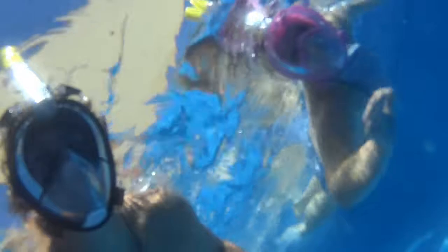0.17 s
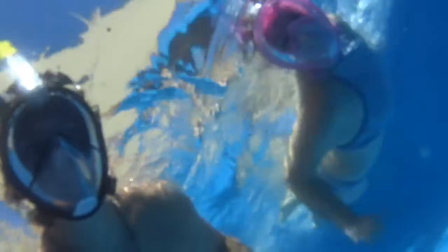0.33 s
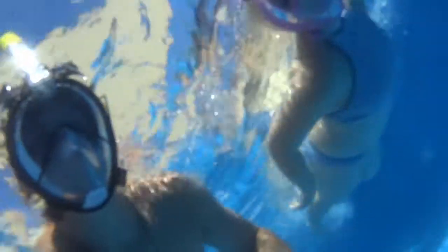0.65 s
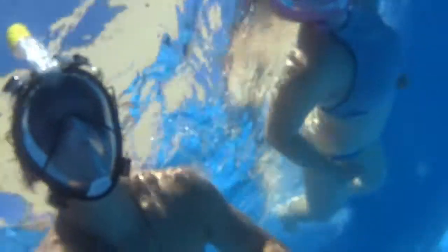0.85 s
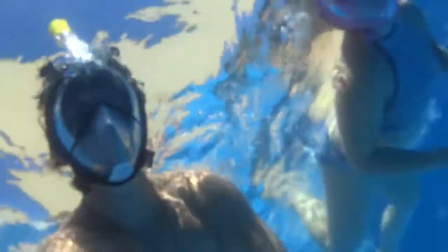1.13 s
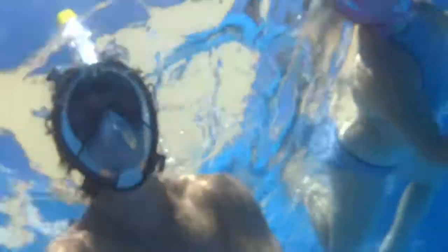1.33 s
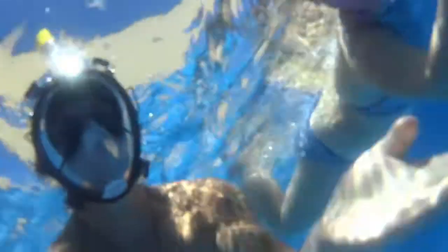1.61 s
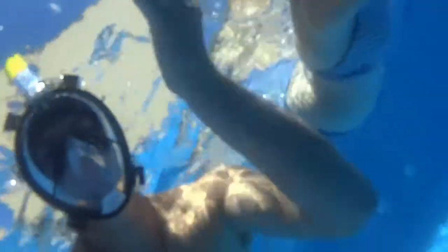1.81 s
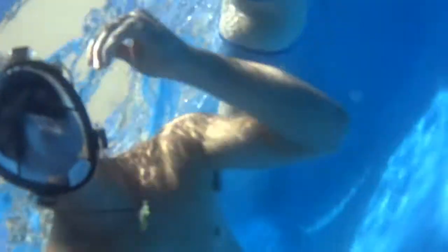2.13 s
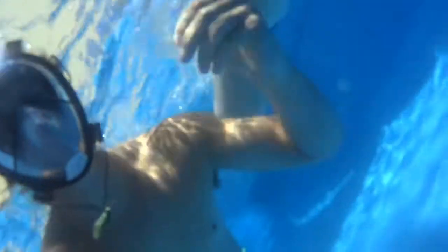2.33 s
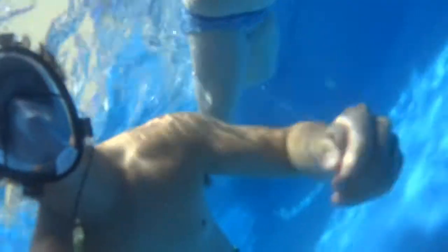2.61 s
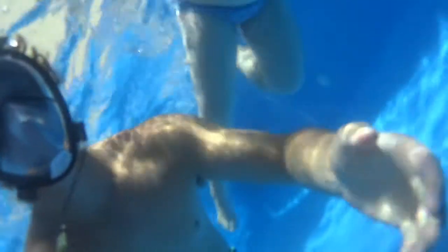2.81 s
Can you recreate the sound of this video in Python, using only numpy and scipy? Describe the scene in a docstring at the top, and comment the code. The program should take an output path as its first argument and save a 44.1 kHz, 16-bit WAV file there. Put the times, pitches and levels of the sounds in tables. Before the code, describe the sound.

Muffled water swishes and gurgles around a submerged camera beside two snorkelers; surges swell early, a sharp click comes midway, then deep bubble gulps and a stronger wash, heard close through the sealed housing.

```python
"""Under water in a pool: a small camera in a sealed housing is held while two swimmers paddle beside it.
Moving water drums the housing in dense soft grains that ring its modes; eddies rumble on its two ports.
Single bubbles gulp, with low thumps and short high pings among them, all rising tones; tiny bubbles blip.
Ticks and splashes are short noise rattles on the modes. A faint hiss follows the treble wash; the recorder
mirrors the sound faintly into the treble and cuts the top."""
import sys
import numpy as np
from scipy import signal
from scipy.fft import rfft, irfft
from scipy.io import wavfile

SR = 44100
rng = np.random.default_rng(int(sys.argv[2]) if len(sys.argv) > 2 else 0)


def materialize(psi):
    """Save the field psi as 16-bit PCM at rate SR to the path in sys.argv[1].

    A 1-D psi becomes a single channel; in a 2-D psi each row is a channel.
    """
    bounded = np.clip(np.atleast_2d(psi).T, -1, 1)
    quanta = np.round(bounded * 32767).astype(np.int16)
    wavfile.write(sys.argv[1], SR, quanta)


N = 130095

MIDDLE_FROM_HZ, TREBLE_FROM_HZ = 850, 2300
SPRAY_OWN = 0.71   # spray's side-to-mid amplitude; half of it is the ports' own share in tick snaps

# housing modes: pitch_hz, pole_width_hz, level_db (relative, within bass, middle or treble)
HOUSING_MODES = [(491.3, 80, 1.5), (595.7, 110, -5.5), (678.4, 130, -8), (951, 190, -7.5), (1329, 110, -13),
                 (1466, 240, -17.5), (1806, 220, -18.5), (2113, 590, -29.5), (2905, 440, -19.5),
                 (3560, 480, -33.5), (4130, 560, -31)]
# wash on the housing, upper zones: time_s, middle_db, treble_db
WASH_UPPER = [(0, -30, -37), (.33, -22.5, -32.5), (0.701, -31.5, -43.5), (.86, -26, -32),
              (1.05, -24, -34.5), (1.28, -32.5, -39), (1.36, -38.5, -41.5), (1.8, -46, -44.5),
              (1.9, -36, -40), (1.999, -37.5, -45), (2.1, -29, -37), (2.2, -31.5, -35),
              (2.38, -37.5, -46.5), (2.7, -30, -36), (2.95, -36, -46)]
# power share of grains and rattles that each port has for itself: bass, middle, treble [0-1]
OWN_SHARES = [0.0071, 0.019, 0.41]


def from_db(db):
    """Decibels to amplitude gain."""
    return 10 ** (np.asarray(db) / 20)


def rms_one(x):
    """Scale to rms 1."""
    return x / np.sqrt(np.mean(x ** 2) + 1e-20)


def in_time(rows):
    """Value columns of a time curve, interpolated to every sample."""
    time_s, *columns = np.transpose(rows)
    return [np.interp(np.arange(N) / SR, time_s, column) for column in columns]


def log_bins():
    """Log frequency of each FFT bin, from 1 Hz up."""
    return np.log(np.maximum(np.arange(N // 2 + 1) * SR / N, 1))


def zone_of(hz):
    """0 bass, 1 middle, 2 treble."""
    return int(hz > MIDDLE_FROM_HZ) + int(hz > TREBLE_FROM_HZ)


def drift(corner_hz):
    """Slow random curve of rms 1: noise through two equal low-pass poles."""
    step = 40   # samples between computed points
    warm_up = 500
    r = np.exp(-2 * np.pi * corner_hz * step / SR)
    noise = rng.standard_normal(N // step + warm_up + 2)
    slow = signal.lfilter([1], [1, -2 * r, r * r], noise)[warm_up:]
    return np.interp(np.arange(N) / step, np.arange(len(slow)), rms_one(slow))


def resonate(x, hz, pole_width_hz):
    """Steep resonance: the same pole pair twice over, peak gain about 1."""
    r = np.exp(-np.pi * pole_width_hz / SR)
    section = [(1 - r * r) / 2, 0, (r * r - 1) / 2, 1, -2 * r * np.cos(2 * np.pi * hz / SR), r * r]
    return signal.sosfilt([section, section], x + 1e-18)


def coloured(spectrum, own):
    """Stereo noise of rms 1, shaped in frequency; own is the side-to-mid amplitude."""
    hz, db = np.transpose(spectrum)
    gain = from_db(np.interp(log_bins(), np.log(hz), db))
    mid, side = irfft(rfft(rng.standard_normal((2, N))) * gain, N)
    return rms_one(mid + own * side * [[1], [-1]])


def grains(per_s, spread_db):
    """Three trains of uneven soft contacts, random in time and sign: one common, one for each port."""
    sizes = from_db(spread_db * np.minimum(rng.exponential(1, (3, N)), 4))
    signs = rng.choice([-1, 1], (3, N))
    return rms_one(sizes * signs * (rng.random((3, N)) < per_s / SR))


def at_ports(three, own):
    """Mix the common signal with each port's own, by power share."""
    return np.sqrt(1 - own) * three[0] + np.sqrt(own) * three[1:]


def treble_swing_db():
    """Share of the treble wash's swing that spray follows."""
    follows = 0.62
    db = in_time(WASH_UPPER)[1]
    return follows * (db - db.mean())


def rising_tones(rows):
    """Tones with a quick swell, a longer fade and slightly rising pitch."""
    rise = 0.044   # share of pitch gained per length
    out = np.zeros(N + SR)
    for start_s, peak_db, hz, cycles in rows:
        u = np.arange(int(3 * cycles / hz * SR)) / SR * hz / cycles   # time in lengths, 0 to 3
        tone = np.sin(2 * np.pi * cycles * u * (1 + rise * (u - 1) / 2))
        envelope = 3 * u * np.exp(1 - 3 * u)
        start = int(start_s * SR)
        out[start:start + len(u)] += from_db(peak_db) * envelope * tone
    return out[:N]


def rattles(rows, decay_s):
    """Dying noise bursts ring the modes, those near each burst's own pitch most, plus a bare snap."""
    focus_db_per_octave, vary_db, snap_db = 11.0, 2.5, -25
    out, t = np.zeros((2, N + SR)), np.arange(SR // 10) / SR
    for start_s, peak_db, focus_hz in rows:
        burst = rng.standard_normal((3, len(t))) * np.exp(-t / decay_s)
        ring = np.zeros((2, len(t)))
        for hz, pole_width_hz, _ in HOUSING_MODES:
            octaves_off = abs(np.log2(hz / focus_hz))
            gain = from_db(rng.normal(0, vary_db) - focus_db_per_octave * octaves_off)
            struck = at_ports(burst, OWN_SHARES[zone_of(hz)])
            ring += gain / np.sqrt(pole_width_hz) * resonate(struck, hz, pole_width_hz)
        snap = from_db(snap_db) * at_ports(burst, SPRAY_OWN / 2)
        start = int(start_s * SR)
        out[:, start:start + len(t)] += from_db(peak_db) * (ring / np.abs(ring).max() + snap)
    return out[:, :N]


def wash():
    """Grains of its own ring each housing mode; surges swell all modes together and each alone."""
    # strength in the bass: time_s, bass_db
    wash_bass = [(0, -20), (.05, -26.5), (.2, -16.5), (.38, -18.5), (.5, -22.5), (.62, -22), (.72, -27),
                 (.93, -22), (1.33, -31.5), (1.582, -24.5), (1.655, -44), (1.69, -31), (2.0, -26),
                 (2.1, -17), (2.3, -15), (2.47, -21), (2.701, -22.5), (2.85, -32.5), (2.95, -34)]
    # where the housing hardly passes sound: pitch_hz, pole_width_hz, depth (0-1)
    dead_spots = [(886, 300, 0.87), (1730, 72, 0.76)]
    # grain size spread: bass_db, middle_db, treble_db
    grain_spreads_db = [1.7, 3.5, 4]
    # surge spread of each mode alone: bass_db, middle_db, treble_db
    surges_db = [1.4, 2.5, 3]
    surge_corner_hz, surge_shared = 19, .5
    grains_per_s_per_hz = 3.2   # per Hz of pole width
    brighten_per_octave = .8   # stronger bass wash rings its higher modes more: dB per dB

    together, zones = drift(surge_corner_hz), np.zeros((3, 2, N))
    bass_db, = in_time(wash_bass)
    for hz, pole_width_hz, level_db in HOUSING_MODES:
        zone = zone_of(hz)
        if zone == 0:
            octaves_up = np.log2(hz / HOUSING_MODES[0][0])
            level_db = level_db + brighten_per_octave * octaves_up * (bass_db - bass_db.max())
        surge = surge_shared * together + drift(surge_corner_hz)
        gain = from_db(level_db + surges_db[zone] * surge)
        contacts = grains(grains_per_s_per_hz * pole_width_hz, grain_spreads_db[zone])
        zones[zone] += resonate(gain * at_ports(contacts, OWN_SHARES[zone]), hz, pole_width_hz)
    levels_db = [bass_db] + in_time(WASH_UPPER)
    out = sum(from_db(db) * rms_one(zone) for db, zone in zip(levels_db, zones))
    for hz, pole_width_hz, depth in dead_spots:
        out = out - depth * resonate(out, hz, pole_width_hz)
    return out


def rumble():
    """Eddies on the ports: low noise with random lumps in level."""
    # eddy strength before lumps: time_s, level_db
    strength = [(0, -38), (.7, -45), (1.3, -44.5), (1.56, -37.5), (1.64, -49), (1.7, -37), (1.84, -45.5),
                (1.97, -37.5), (2.04, -27), (2.34, -23), (2.4, -32), (2.45, -24.5), (2.6, -29.5),
                (2.64, -47), (2.7, -23), (2.8, -51), (2.95, -48)]
    # relative spectrum: freq_hz, density_db (per Hz)
    colour = [(20, -5.5), (120, 3), (240, -2.5), (380, -0.5), (490, -57)]
    db, = in_time(strength)
    lumps_db = 2.6 * drift(corner_hz=24)
    return from_db(db + lumps_db) * coloured(colour, own=0.019)


def spray():
    """Faint flickering hiss that fills the top and follows the treble wash."""
    # relative spectrum: freq_hz, density_db (per Hz)
    colour = [(2000, -57), (4500, 1.5), (6300, -11.5), (10000, -17), (16000, -25.5)]
    mean_db = -49
    flicker_db = 2.4 * drift(corner_hz=55)
    return from_db(mean_db + treble_swing_db() + flicker_db) * coloured(colour, SPRAY_OWN)


def blips():
    """Tiny bubbles of chance pitch and level, the higher fainter; half are louder at each port."""
    per_s, base_db, mean_cycles = 70, -33.5, 16
    low_hz, high_hz = 950.5, 5460
    when, pitch, faintness, length = rng.random((int(per_s * N / SR), 4)).T
    peak_db = base_db - 10 * np.log10(faintness + 0.15) - 10 * pitch
    pitch_hz = low_hz * (high_hz / low_hz) ** pitch
    rows = np.transpose([when * N / SR, peak_db, pitch_hz, mean_cycles * (.5 + length)])
    one, other = rising_tones(rows[::2]), rising_tones(rows[1::2])
    # half the spray's swing in dB
    return from_db(treble_swing_db() / 2) * np.array([one + other / 2, one / 2 + other])


def ticks():
    """Ticks on the housing: very short rattles."""
    # start_s, peak_db (of the ring), focus_hz (where it rings most)
    tick_rows = [(0.3045, -17.5, 3200), (1.249, -17, 2950), (1.3367, -18, 3620), (1.441, -22.5, 2930),
                 (1.4722, -12, 2350), (1.477, -12, 1080), (1.5344, -6, 2570), (1.5617, -14, 2780),
                 (1.637, -25, 4230), (1.8076, -22.5, 3170), (1.922, -17, 3000)]
    return rattles(tick_rows, decay_s=0.002)


def gulps_thumps_and_pings():
    """Single bubbles gulp, low thumps and short high pings among them; the same at both ports."""
    # start_s, peak_db, pitch_hz, length_cycles
    tone_rows = [(.997, -14.5, 117, 0.57), (1.179, -11.5, 650, 3.5), (1.518, -11, 760, 7),
                 (1.609, -31.5, 4200, 17), (1.620, -30, 1820, 20), (1.682, -37, 4140, 19),
                 (1.698, -10, 479, 3), (1.749, -14.5, 327, 4.2), (1.767, -30, 5040, 10),
                 (1.855, -13, 569, 6.4), (1.895, -27, 2710, 22), (1.913, -22.5, 1302, 25),
                 (2.019, -25.5, 122, 2.2), (2.074, -18.5, 987, 8.9), (2.354, -9.5, 151, 1.4),
                 (2.372, -3.5, 510, 13), (2.42, -7.5, 551, 14.7), (2.496, -15, 242, 4.7),
                 (2.523, -8.5, 527, 6.3), (2.577, -12.5, 132, 0.9), (2.752, -15.5, 402, 7)]
    return rising_tones(tone_rows)


def splashes():
    """Small splashes: longer rattles."""
    # start_s, peak_db (of the ring), focus_hz (where it rings most)
    splash_rows = [(1.703, -26, 1520), (1.848, -20.5, 2840), (2.438, -17, 1460), (2.519, -11, 1230),
                   (2.708, -14, 2970)]
    return rattles(splash_rows, decay_s=0.013)


def scene():
    """Sum at the two ports; left is softer and right lags in phase, depending on frequency."""
    # port differences: freq_hz, right_lag_rad, left_loss_db
    port_rows = [(40, .08, 0), (200, .55, 1.7), (560, .48, 3.7), (1050, .03, .8), (2600, .75, 1.3),
                 (4000, .5, .8)]
    water = wash() + rumble() + spray() + blips()
    left, right = rfft(water + ticks() + gulps_thumps_and_pings() + splashes())
    hz, lag_rad, loss_db = np.transpose(port_rows)
    left_loss_db = np.interp(log_bins(), np.log(hz), loss_db)
    right_lag_rad = np.interp(log_bins(), np.log(hz), lag_rad)
    return irfft([left * from_db(-left_loss_db), right * np.exp(-1j * right_lag_rad)], N)


def record(dry):
    """Carriers multiply the mono mix, so the strong bass leaves faint mirror images; the top is cut."""
    # image level about each multiple of image_hz: level_db
    images_db = [-43, -45.5, -49, -49]
    image_hz, stop_hz = 3890, 16000
    t = np.arange(N) / SR
    carrier = np.zeros(N)
    for multiple, db in enumerate(images_db, 1):
        carrier += from_db(db) * 2 * np.cos(2 * np.pi * image_hz * multiple * t)
    top_cut = signal.cheby2(22, 55, stop_hz, fs=SR, output="sos")   # 55 dB down from stop_hz up
    return signal.sosfilt(top_cut, dry + carrier * dry.mean(axis=0))


dry = scene()
out = record(dry)
materialize(out)
```